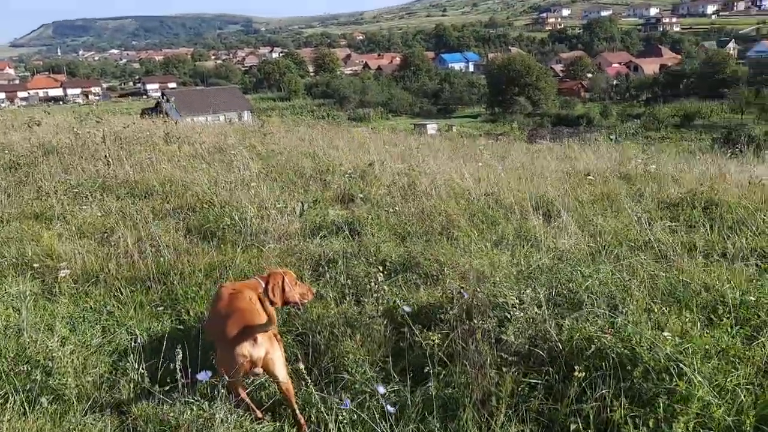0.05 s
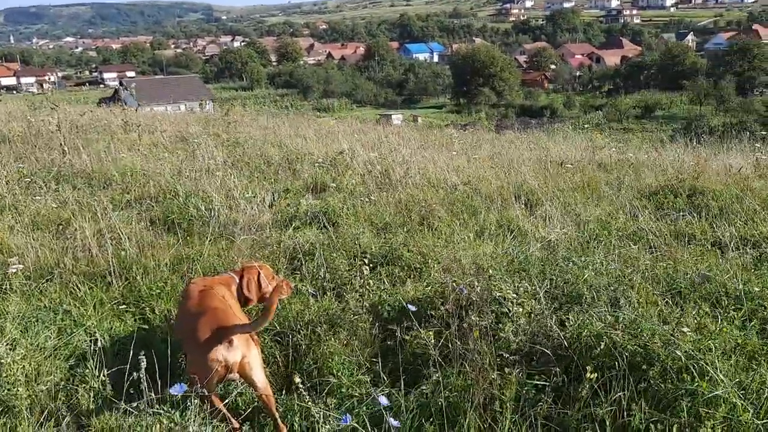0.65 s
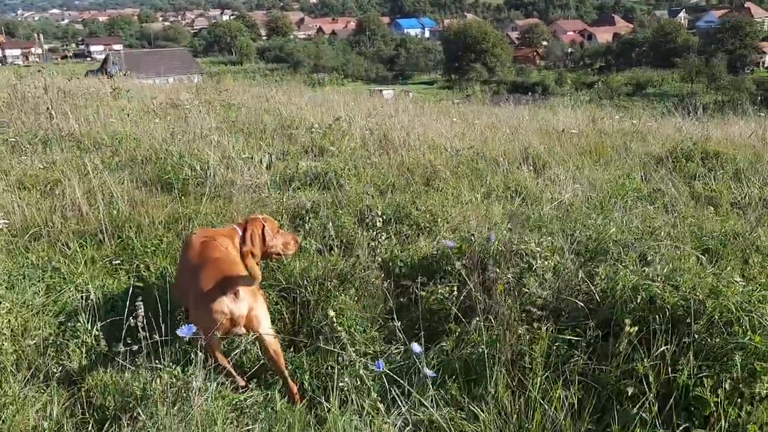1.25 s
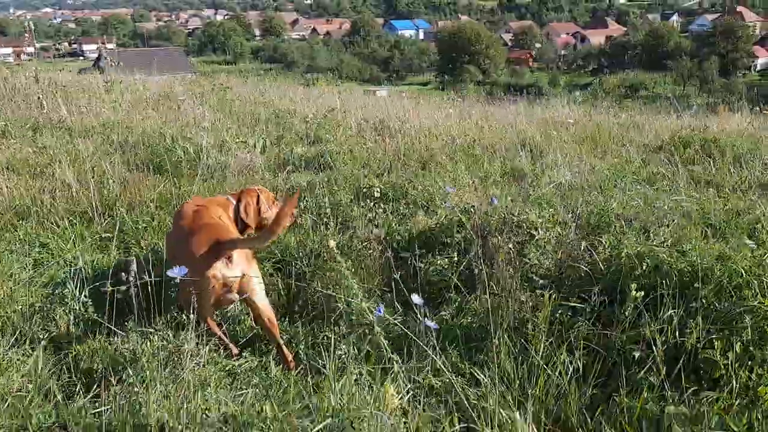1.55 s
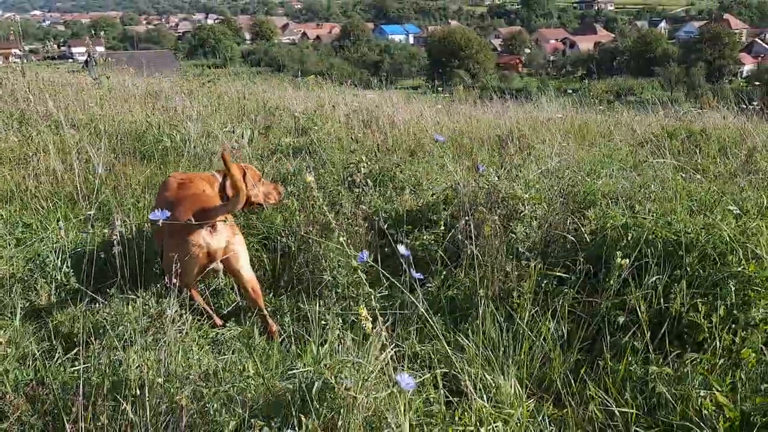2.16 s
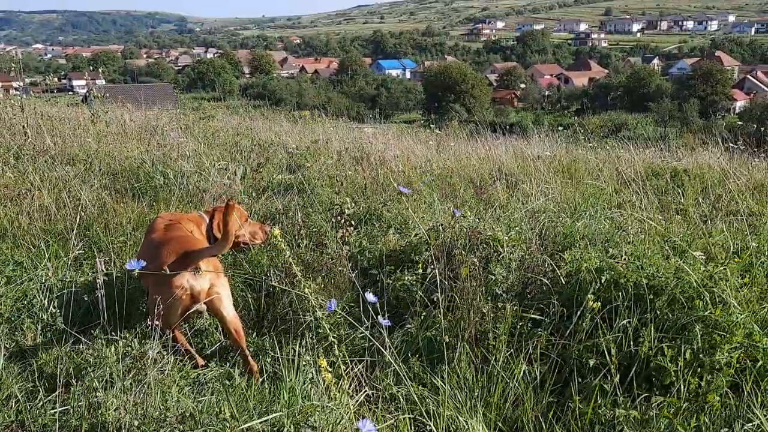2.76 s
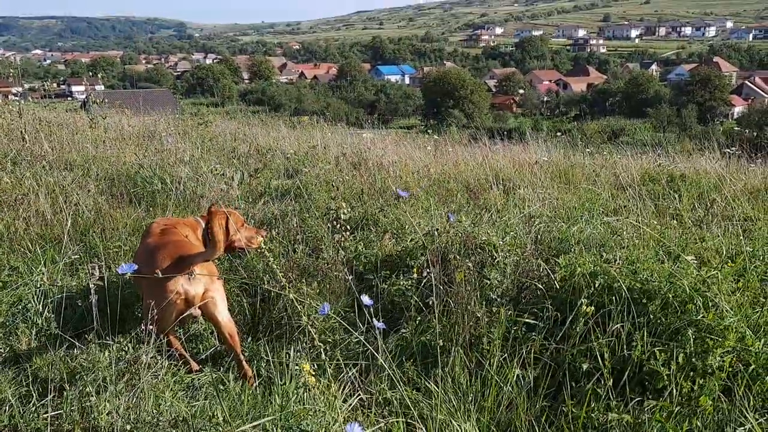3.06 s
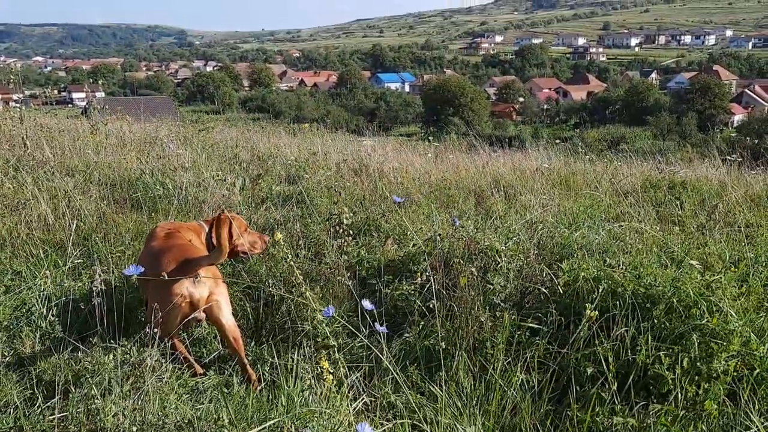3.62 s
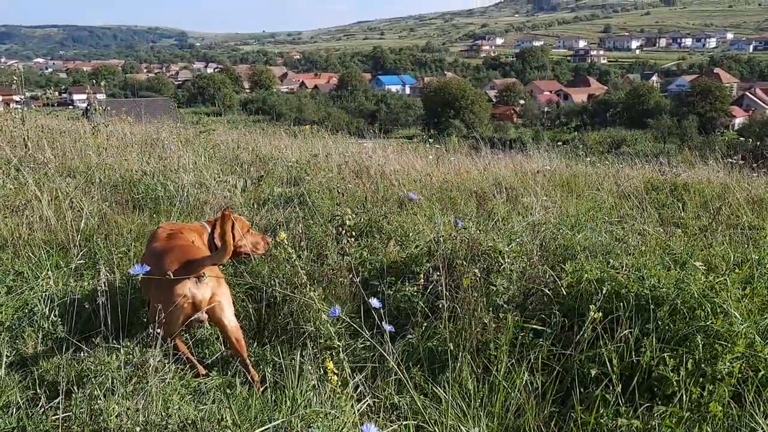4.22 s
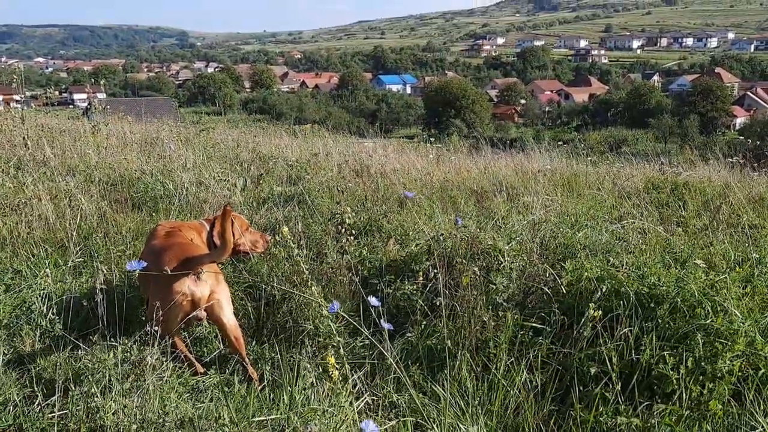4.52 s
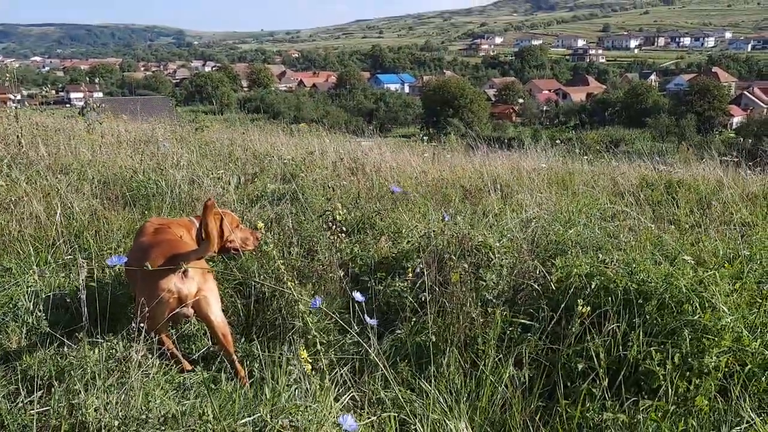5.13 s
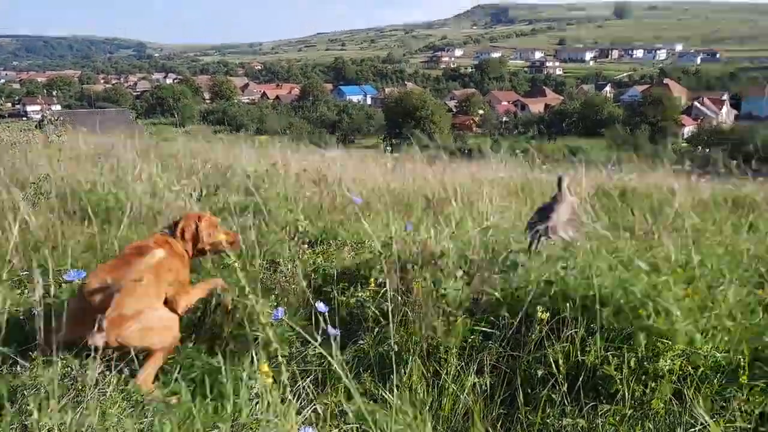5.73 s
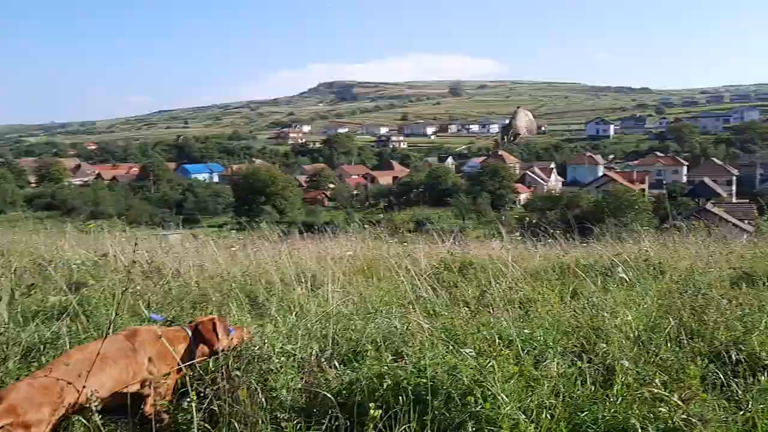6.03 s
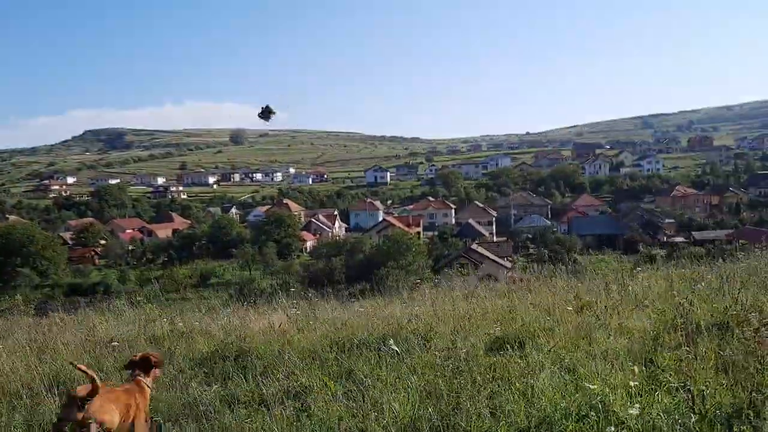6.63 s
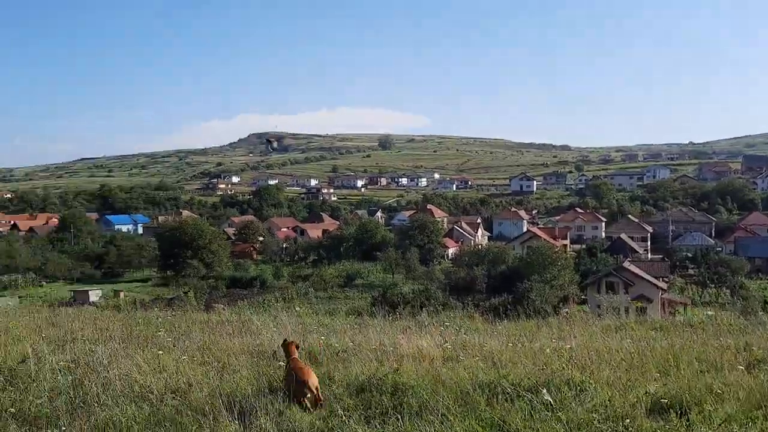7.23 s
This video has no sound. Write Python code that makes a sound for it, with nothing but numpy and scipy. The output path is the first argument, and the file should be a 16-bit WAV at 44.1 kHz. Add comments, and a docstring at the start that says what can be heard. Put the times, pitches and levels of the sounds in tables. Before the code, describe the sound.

In a breezy, quiet meadow, grass stirs softly until a game bird suddenly flushes, stalks snapping and wings whirring away, with wind buffeting the microphone.

```python
"""Pheasant flushed on a hillside

In a meadow above a village, a light breeze hushes over the valley and buffets the microphone ports.
A dog stands on point: grass rustles, stalks snap, a steel clasp clinks on the left and two knocks carry
up from below. Noise suppression leaves two faint tones. A few metres off, a pheasant bursts from cover
with a thin squeak and whirrs away at 13 wing beats a second, the dog crashing through the grass after it."""
import sys
import numpy as np
from scipy import signal
from scipy.fft import rfft, irfft, next_fast_len
from scipy.io import wavfile
from scipy.ndimage import uniform_filter1d, map_coordinates

SR = 44100
rng = np.random.default_rng(int(sys.argv[2]) if len(sys.argv) > 2 else 0)


def wav_record(signal):
    """Record a signal, one row per channel, as 16-bit PCM in the file named by sys.argv[1]."""
    frames = np.transpose(np.atleast_2d(signal))
    bounded = np.clip(frames, -1, 1)
    # unit amplitude maps onto the largest positive 16-bit level
    quanta = np.round(bounded * 32767).astype(np.int16)
    wavfile.write(sys.argv[1], SR, quanta)


N = 329868

# Levels are relative within a layer; pan_db is the left port minus the right.
# breeze out over the valley: time_s, hum_db, hush_db
BREEZE = [(0.0, -63, -61), (0.75, -63.5, -60.5), (1.3, -66, -61.5), (1.56, -66.5, -57),
          (1.75, -67.5, -60.5), (2.5, -72, -62.5), (3.25, -78.5, -65.5), (4.05, -73.5, -61.5),
          (4.3, -75, -59), (4.52, -73.5, -56.5), (4.7, -74.5, -62), (5.45, -75, -63.5), (7.0, -65, -64),
          (7.48, -76.5, -65)]
# spectra of the valley's hum and hush, and of wind on the microphone: frequency_hz, level_db
HUM_SPECTRUM = [(150, -18.5), (300, -6.5), (550, -4.5), (1000, 2), (1400, -3.5), (3000, -33), (6000, -86.5)]
HUSH_SPECTRUM = [(290, -41), (500, -36), (553, -29), (855, -5), (1050, -20), (1180, -2.5), (1720, -1),
                 (2010, -3.5), (2650, -4.5), (3060, -8), (4150, -32.5), (5800, -36), (9220, -45),
                 (15100, -34.5), (16000, -46.5)]
RUMBLE_SPECTRUM = [(22, -23.5), (35, -12.5), (52, 1), (68, 4), (95, -5), (130, -4), (180, -18.5),
                   (240, -24), (400, -38.5), (800, -76.5)]
# the camera body's colouring of the valley at the left port: frequency_hz, gain_db
VALLEY_TILT = [(700, -2.5), (1200, 1.5), (1900, 1.5), (2700, -12.5), (3600, -6.5), (5000, 1)]
# draught on the ports, jumping as the camera swings after the bird: time_s, level_db, pan_db
DRAUGHT = [(0.0, -65.5, -6), (1.0, -66.5, -2.5), (1.3, -58.5, -9), (2.2, -65, 2), (3.4, -63, 0.5),
           (4.25, -62, -1.5), (4.55, -56, 6.5), (4.9, -60.5, 6), (5.62, -62, 5), (5.69, -34.5, -3),
           (6.12, -34.5, 4), (6.45, -46.5, 5), (7.0, -50.5, 1), (7.27, -62, 12), (7.48, -50, 10)]
# single eddies thumping on the ports: centre_s, length_s, level_db, pan_db
EDDIES = [(0.333, 0.05, -54.5, -22), (1.61, 0.068, -54.5, -25), (1.976, 0.032, -54, -12),
          (2.532, 0.044, -40, 23), (2.713, 0.043, -51.5, 15), (2.954, 0.062, -53.5, 15),
          (4.004, .11, -52.5, 18), (4.332, 0.069, -50.5, -22), (4.464, 0.061, -36, -2),
          (4.584, 0.055, -38, 0.5), (4.69, 0.056, -40.5, 13), (4.758, 0.046, -43, 9),
          (4.897, 0.074, -43, 25), (5.161, 0.075, -38, 30), (5.231, 0.054, -42.5, 29),
          (5.433, 0.061, -42.5, 24.5), (5.524, 0.048, -42.5, 27), (5.796, 0.044, -26, -5),
          (6.058, 0.043, -30.5, 3), (6.282, 0.042, -30, 18), (6.34, 0.029, -29, 22), (6.513, 0.041, -36, 8),
          (7.126, 0.11, -39, 20), (7.365, 0.055, -44.5, 18)]
# slow stirring of the grass: time_s, level_db, pan_db
GRASS_STIR = [(0.0, -63.5, 5.5), (0.17, -67, 4), (0.26, -72.5, 4), (0.47, -71, 6), (0.55, -64, 9.5),
              (0.88, -57, 4.5), (1.11, -68.5, 6), (1.25, -66, 6), (1.4, -62, 9), (1.55, -70, 6),
              (1.75, -75.5, 4), (2.3, -75, 2.5), (2.68, -81, -1), (2.95, -91, 4.5), (5.5, -88, -1),
              (5.58, -74, 0)]
# spectra of rubbed leaves, blades, stems and whole thrashed tufts: frequency_hz, level_db
LEAF_SPECTRUM = [(1500, -25), (3000, 2), (4600, -4), (6300, 0), (9000, -11), (11200, -4), (13200, 2),
                 (15700, 1)]
BLADE_SPECTRUM = [(1300, -18), (2400, -11), (3400, -4.5), (4400, -12), (6500, -0.5), (9000, -7.5),
                  (12000, 1), (14500, 6.5), (15900, -5)]
STEM_SPECTRUM = [(1400, -10.5), (2900, 0.5), (4200, -5), (6200, -3.5), (7500, -24), (11000, -44)]
THRASH_SPECTRUM = [(200, 3), (450, 3.5), (800, 5.5), (1300, 1.5), (2400, 1), (3200, -10), (6000, -30.5)]
# the camera body's shading of nearby sounds: frequency_hz, pan_db
PORT_TILT = [(3000, 1.5), (5500, -11), (8300, 14), (11000, 9.5), (15000, -8.5)]
# snapping stalks: start_s, level_db, pan_db, brightest_hz
STALK_SNAPS = [(0.383, -41.5, 13.5, 11400), (1.316, -44.5, 15, 7500), (1.6392, -41.5, 10, 6500),
               (2.271, -51, 10, 14300), (2.668, -46, 7.5, 14500), (5.6521, -28, -2.5, 5900),
               (5.6638, -35, -4.5, 6140), (5.679, -25, -2.5, 5900), (5.7325, -25.5, -3, 6430),
               (5.85, -19.5, 4.5, 7320), (5.8575, -24.5, -8, 6900), (5.921, -30, 1, 13600),
               (6.75, -37, 7.5, 15300), (7.1782, -39.5, 3, 13600)]
# knocks down in the village: start_s, level_db
KNOCKS = [(0.529, -28), (1.15, -22)]
# resonances of the struck wood: centre_hz, width_hz, level_db
WOOD_MODES = [(508, 103, -2.5), (808, 170, 0), (2150, 490, -9.5), (2770, 160, -4.5), (3420, 290, -16),
              (5330, 650, -23.5)]
# decay of the valley's echo: frequency_hz, t60_s
ECHO_DECAY = [(300, 0.27), (2500, .22), (4000, 0.21), (8000, 0.074)]
# clinks of the clasp: start_s, level_db
CLINKS = [(1.39, -38.5), (1.411, -31.5), (1.4342, -13.5), (1.4695, -33.5)]
# ringing of its steel: pitch_hz, level_db, t60_s
CLASP_MODES = [(6760, -14, .03), (11700, -13, .06), (12100, -8, .055), (14680, -2, .11)]
# two tones left by noise suppression, then five brief chirps: start_s, length_s, start_hz, end_hz, level_db
FAINT_TONES = [(2.192, 0.16, 1945, 2020, -69), (3.048, 0.35, 2565, 2560, -74), (4.91, 0.032, 925, 860, -65),
               (5.205, 0.034, 900, 840, -63), (6.873, .016, 5180, 5470, -50),
               (6.925, 0.011, 2200, 1290, -44.5), (7.413, 0.037, 6500, 6330, -60)]
# bird and dog crashing through the grass: time_s, hiss_db, stem_db, hiss_pan_db
GRASS_CRASH = [(5.58, -65, -66.5, 5), (5.625, -62, -58.5, 4), (5.675, -39, -34.5, 3),
               (5.755, -49.5, -41.5, 3), (5.795, -39, -32, 3), (5.835, -48.5, -43, 1.5),
               (5.97, -51.5, -46, 2), (6.03, -46, -42.5, 6), (6.12, -50, -48.5, 6), (6.19, -42, -46.5, 11),
               (6.32, -44.5, -43.5, 11), (6.37, -53.5, -50.5, 10.5), (6.54, -61.5, -59.5, 8.5),
               (6.83, -53.5, -56, 2.5), (6.9, -50.5, -49.5, 4), (7.0, -65.5, -65, 3),
               (7.1, -62, -62.5, 4.5), (7.3, -65.5, -66, 4), (7.48, -66.5, -59.5, 6.5)]
# wing beats: downstroke_s, strength_db
WING_BEATS = [(5.7288, 2.5), (5.7983, 1.5), (5.8724, -1), (5.9501, -1), (6.0245, 1), (6.1015, -3),
              (6.1772, 0.5), (6.2531, -3.5), (6.3264, 3), (6.4078, -0.5), (6.4833, -2), (6.561, -4),
              (6.6391, -1), (6.716, -5.5), (6.797, -1)]
# the bird climbs hard, then levels off: time_s, effort_db, whoop_hz
CLIMB = [(5.76, -13, 600), (5.83, -1.5, 580), (5.99, 0, 461), (6.22, 3, 482), (6.29, -10, 320),
         (6.8, -12, 291)]
# spectra of shoved air and of rubbed feathers: frequency_hz, level_db
WHOOP_SPECTRUM = [(100, -25), (260, 0.5), (380, 1), (520, -0.5), (700, -5), (1100, -10.5), (2500, -24),
                  (6000, -75)]
FEATHER_SPECTRUM = [(400, -21.5), (900, 8), (2200, 8), (3600, 9.5), (6200, -4), (8000, -14.5),
                    (16000, -35.5)]
# claps of the wings: start_s, level_db
WING_CLAPS = [(5.7307, -23), (5.797, -29.5), (5.874, -36), (6.026, -32.5), (6.179, -36)]
# the bird's squeak: time_s, pitch_hz, level_db
SQUEAK = [(5.738, 4950, -53), (5.749, 4880, -41), (5.756, 4564, -37), (5.769, 4750, -39),
          (5.786, 5210, -35), (5.796, 4800, -41), (5.810, 5090, -36), (5.826, 4360, -58)]


def amp(db):
    """Decibels to gain."""
    return 10 ** (np.asarray(db) / 20)


def unit(x):
    """Scale to rms 1."""
    return x / np.sqrt(np.mean(x ** 2) + 1e-20)


def along(points, hz):
    """Read (frequency_hz, value) points on a log axis."""
    frequencies, values = np.transpose(points)
    return np.interp(np.log(hz + 1), np.log(frequencies + 1), values)


def curves(rows):
    """One value per sample for each column after the time."""
    times, *columns = np.transpose(rows)
    return [np.interp(np.arange(N) / SR, times, column) for column in columns]


def wobble(rate):
    """A smooth random curve, rate knots a second."""
    return map_coordinates(rng.standard_normal(int(N * rate / SR) + 4), [np.arange(N) * rate / SR])


def add(track, start_s, sound):
    """Mix a sound into a track."""
    start = round(start_s * SR)
    track[..., start:start + sound.shape[-1]] += sound


def swells(times, levels_db, rise_s, fall_s):
    """An envelope with one swell per stroke."""
    envelope, t = np.zeros(N + SR), np.arange(SR // 8) / SR
    shape = np.where(t < rise_s, np.sin(np.pi / 2 * t / rise_s), np.exp(-np.abs(t - rise_s) / fall_s))
    for start_s, db in zip(times, levels_db):
        add(envelope, start_s, amp(db) * shape)
    return envelope[:N]


def filtered(x, response):
    """x times a complex response of frequency."""
    size = x.shape[-1]
    padded = next_fast_len(size + 8192)
    return irfft(rfft(x, padded) * response(np.fft.rfftfreq(padded, 1 / SR)), padded)[..., :size]


def coloured(x, spectrum):
    """x given a spectrum, at rms 1."""
    return unit(filtered(x, lambda hz: amp(along(spectrum, hz))))


def steadied(x, seconds):
    """Even out the chance swells of a noise."""
    power = uniform_filter1d(np.mean(x ** 2, axis=0), int(seconds * SR) + 1)
    return x / np.sqrt(np.abs(power) + 1e-6)


def patchy(x, depth_db):
    """Narrow bands swell and fade on their own."""
    bands = signal.stft(x, nperseg=2048)[2]
    patches = uniform_filter1d(rng.standard_normal(bands.shape[1:]), size=4, axis=0)
    patches = uniform_filter1d(patches, size=14, axis=1, mode="wrap")
    return unit(signal.istft(bands * amp(depth_db * unit(patches)), nperseg=2048)[1][:, :N])


def port_noise(alike):
    """White noise at the two microphone ports, which share the fraction alike of its power."""
    return np.sqrt(alike) * rng.standard_normal(N) + np.sqrt(1 - alike) * rng.standard_normal((2, N))


def placed(x, pan_db, lag_ms=0):
    """Stereo with the left port louder by pan_db and later by lag_ms."""
    left, right = np.broadcast_to(x, (2, x.shape[-1]))
    if lag_ms:
        left = filtered(left, lambda hz: np.exp(-2j * np.pi * hz * lag_ms / 1000))
    gain = amp(pan_db / 2)
    return np.array([left * gain, right / gain]) / np.sqrt((gain ** 2 + gain ** -2) / 2)


def shaded(x):
    """The camera body shades each port at different frequencies."""
    return filtered(x, lambda hz: amp(np.outer([.5, -.5], along(PORT_TILT, hz))))


def valley_breeze():
    """The valley hums and hushes from the right; the camera body colours it on the far port."""
    hum_db, hush_db = curves(BREEZE)
    hum = amp(hum_db + 5.5) * patchy(coloured(port_noise(0.78), HUM_SPECTRUM), depth_db=3)
    hush_gain = amp(hush_db + 2 + 1.4 * wobble(12))
    hush = hush_gain * patchy(coloured(port_noise(0.32), HUSH_SPECTRUM), depth_db=3)
    left, right = placed(hum, pan_db=1, lag_ms=0.33) + placed(hush, pan_db=-6, lag_ms=0.43)
    return np.array([filtered(left, lambda hz: amp(along(VALLEY_TILT, hz))), right])


def microphone_wind(flicker_db=3, eddy_flicker_db=2):
    """A restless draught rumbles right on the ports; each passing eddy swells and dies in a bell shape."""
    t = np.arange(N) / SR
    draught_db, draught_pan_db = curves(DRAUGHT)
    draught_gain = amp(draught_db + flicker_db * wobble(14))
    draught = draught_gain * steadied(coloured(port_noise(0.6), RUMBLE_SPECTRUM), seconds=.04)
    thumps = sum(placed(amp(db) * np.exp(-2 * ((t - centre_s) / length_s) ** 2), pan_db)
                 for centre_s, length_s, db, pan_db in EDDIES)
    rumble = steadied(coloured(port_noise(0.5), RUMBLE_SPECTRUM), seconds=0.072)
    return placed(draught, draught_pan_db) + thumps * amp(eddy_flicker_db * wobble(40)) * rumble


def crackle(spectrum, alike, rate, spread_db, flutter_db=1.35):
    """Rubbing noise that catches and slips, with tiny fractures of unequal size, rate a second."""
    size = amp(np.minimum(spread_db * rng.exponential(size=N), 9))
    fractures = (rng.random(N) < rate / SR) * size
    return coloured(port_noise(alike) * (1 + 2 * fractures) * amp(flutter_db * wobble(70)), spectrum)


def grass_stir():
    """Leaves rub softly near the microphone, mostly to the left."""
    db, pan_db = curves(GRASS_STIR)
    leaves = crackle(LEAF_SPECTRUM, alike=0.081, rate=540, spread_db=1.5)
    return shaded(placed(amp(db + 5) * leaves, pan_db))


def stalk_snaps(bend_s=0.0003, crack_s=0.00096, splinter_s=0.013, splinter_db=-16):
    """A dry stalk bends, breaks with a crack in its own colour and splinters briefly."""
    track, t = np.zeros((2, N + SR)), np.arange(SR // 16) / SR
    decay = np.exp(-t / crack_s) + amp(splinter_db) * np.exp(-t / splinter_s)
    shape = decay * (1 - np.exp(-t / bend_s))
    for start_s, db, pan_db, hz in STALK_SNAPS:
        colour = [(hz / 3, -20), (hz * 0.8, -7), (hz, 0), (hz * 1.25, -6), (hz * 3, -11)]
        bright = coloured(rng.standard_normal((2, len(t))), colour)
        woody_db = 3 - 18.5 * np.log2(hz / 6200)  # thin stalks snap higher and with less wood
        woody = amp(woody_db) * coloured(rng.standard_normal(len(t)), FEATHER_SPECTRUM)
        add(track, start_s, placed(amp(db) * (bright + woody) * shape, pan_db))
    return track[:, :N]


def valley_echo(x):
    """A diffuse outdoor tail in which the treble dies first."""
    hz, t, bands = signal.stft(rng.standard_normal((2, SR // 2)), SR, nperseg=256)
    decay = amp(-60 * t / along(ECHO_DECAY, hz)[:, None])
    tail = signal.istft(bands * decay, SR, nperseg=256)[1]
    return signal.fftconvolve(np.atleast_2d(x), tail / np.linalg.norm(tail[0]), axes=1)[:, :N]


def village_knocks(lead_s=0.0069, lead_db=-9, high_cut_hz=6500, echo_db=-6):
    """Two far blows on wood, each a light scraping touch and then the full hit, trailed by the echo."""
    def wood(hz):
        modes = sum((-1) ** k * amp(db) * 1j * hz * width / (centre ** 2 - hz ** 2 + 1j * hz * width)
                    for k, (centre, width, db) in enumerate(WOOD_MODES))
        return modes / (1 + (hz / high_cut_hz) ** 6)

    times, levels_db = np.transpose(KNOCKS)
    touch = swells(times - lead_s, levels_db + lead_db, rise_s=0.0044, fall_s=0.0067)
    blow = swells(times + 0.00079, levels_db, rise_s=0.0015, fall_s=0.0017)
    force = (touch + blow) * rng.choice([-1, 1], N)
    hit = amp(10.5) * filtered(force, wood)
    return placed(hit + amp(echo_db) * valley_echo(hit), pan_db=-4, lag_ms=0.3)


def clasp(tick_s=0.00045, rattle_s=0.01, rattle_db=-25, ring_db=-23, slide_db=-30):
    """Close by on the left, small steel parts slide, tick together and ring very high."""
    track, t = np.zeros(N + SR), np.arange(SR // 8) / SR
    steel = [(600, -28.5), (2000, -5.5), (4500, 1), (9000, -4.5), (14500, 4)]  # frequency_hz, level_db
    shape = np.exp(-t / tick_s) + amp(rattle_db) * np.exp(-t / rattle_s)
    for start_s, db in CLINKS:
        ring = sum(amp(mode_db + rng.normal(0, 2) - 60 * t / t60_s) * np.sin(2 * np.pi * hz * t)
                   for hz, mode_db, t60_s in CLASP_MODES)
        tick = shape * coloured(rng.standard_normal(len(t)), steel)
        add(track, start_s, amp(db - 5.5) * (tick + amp(ring_db) * ring))
    times, levels_db = np.transpose(CLINKS)
    sliding = swells(times - .008, levels_db + slide_db, rise_s=0.0045, fall_s=.004)
    slide = sliding * coloured(rng.standard_normal(N), steel)
    # parts this small radiate no bass
    thin = filtered(track[:N] + slide, lambda hz: hz ** 2 / (hz ** 2 + 1500 ** 2))
    return shaded(placed(thin, pan_db=11.5))


def faint_tones():
    """The recorder's noise suppression leaves narrow tones near 2 and 2.6 kHz; brief chirps come later."""
    track = np.zeros(N)
    for start_s, length_s, start_hz, end_hz, db in FAINT_TONES:
        progress = np.linspace(0, 1, int(length_s * SR))
        tone = np.sin(2 * np.pi * np.cumsum(start_hz + (end_hz - start_hz) * progress) / SR)
        add(track, start_s, amp(db + 4) * np.sin(np.pi * progress) * tone)
    return placed(track, pan_db=-9.5)


def grass_crash(dog_takes_over_s=6.1, handover_s=0.16):
    """Bodies crash through blades, stems and tufts: first the bird, then the dog off to the left."""
    hiss_db, stem_db, hiss_pan_db = curves(GRASS_CRASH)
    blades = amp(hiss_db + 2.5) * crackle(BLADE_SPECTRUM, alike=0.081, rate=1100, spread_db=-0.5)
    bird_stems = crackle(STEM_SPECTRUM, alike=0.37, rate=580, spread_db=7)
    bird_tufts = amp(-1.5) * crackle(THRASH_SPECTRUM, alike=0.85, rate=910, spread_db=-2.5)
    bird = placed(bird_stems, pan_db=-6) + placed(bird_tufts, pan_db=-1)
    dog_stems = crackle(STEM_SPECTRUM, alike=0.073, rate=470, spread_db=7)
    dog_tufts = amp(-1) * crackle(THRASH_SPECTRUM, alike=0.4, rate=540, spread_db=-0.5)
    # the dog reaches the left port first, though a little louder on the right
    dog = placed(dog_stems, pan_db=-2.5, lag_ms=-0.28) + placed(dog_tufts, pan_db=-2.5, lag_ms=-0.32)
    dog_share = np.clip((np.arange(N) / SR - dog_takes_over_s) / handover_s + .5, 0, 1)
    bodies = np.sqrt(1 - dog_share) * bird + np.sqrt(dog_share) * dog
    return shaded(placed(blades, hiss_pan_db)) + amp(stem_db) * bodies


def flight(times, start_m=2.37, accel_m_per_s2=22.5):
    """The bird speeds away from the microphone: distance_db, effort_db, whoop_hz at the given times."""
    distance_m = start_m + accel_m_per_s2 / 2 * (times - WING_BEATS[0][0]) ** 2
    distance_db = 20 * np.log10(start_m / distance_m)
    climb_s, effort_db, whoop_hz = np.transpose(CLIMB)
    return distance_db, np.interp(times, climb_s, effort_db), np.interp(times, climb_s, whoop_hz)


def air_puffs(times, levels_db, pitches_hz, width_s, scatter=0.047):
    """Rounded puffs of air, a few cycles each, sagging in pitch as the wing slows."""
    track = np.zeros(N + SR)
    progress = np.minimum(np.arange(SR // 16) / SR / width_s, 1)
    window = np.sin(np.pi * progress) ** 2
    for start_s, db, hz in zip(times, levels_db, pitches_hz):
        detune, phase = rng.standard_normal(2)
        pitch_hz = hz * (1 + scatter * detune) * (1.15 - 0.26 * progress)
        tone = np.sin(2 * np.pi * np.cumsum(pitch_hz) / SR + np.pi * phase)
        add(track, start_s, amp(db) * window * tone)
    return track[:N]


def wing_air(upstroke_lead_s=.034, turn_lag_s=0.024, down_effort_share=0.48):
    """Each stroke shoves air in a hollow whoop and rubs the feathers; the wing flaps again as it turns."""
    down_s, strength_db = np.transpose(WING_BEATS)
    distance_db, effort_db, down_hz = flight(down_s)
    down_db = strength_db + distance_db + down_effort_share * effort_db
    up_s = down_s[1:] - upstroke_lead_s
    distance_db, effort_db, up_hz = flight(up_s)
    up_db = distance_db + effort_db
    whoop = air_puffs(down_s - .002, down_db - 31.5, down_hz, width_s=0.0213)
    whoop += air_puffs(up_s - .002, up_db - 31.5, up_hz, width_s=0.021)
    whoop += air_puffs(down_s + turn_lag_s, down_db - 30, 0.896 * down_hz, width_s=0.0104)
    wake = swells(down_s, down_db - 30, rise_s=0.0043, fall_s=0.0096)
    wake += swells(up_s, up_db - 36, rise_s=0.0021, fall_s=0.014)
    swish = swells(down_s, down_db - 47, rise_s=0.012, fall_s=0.0046)
    swish += swells(up_s, up_db - 41, rise_s=0.0058, fall_s=0.012)
    air = whoop + wake * steadied(coloured(port_noise(0.98), WHOOP_SPECTRUM), seconds=0.0079)
    feathers = swish * coloured(port_noise(0.21), FEATHER_SPECTRUM)
    return placed(air, pan_db=0.5) + placed(feathers, pan_db=-1)


def wing_tips(high_hz=2400, floor_hz=1250, sweep_s=0.017, push_hz=112, push_s=0.0166, effort_share=0.48):
    """The primaries whip through the air with a short falling whistle over a low push of air."""
    track, t = np.zeros(N + SR), np.arange(SR // 12) / SR
    glide_hz = floor_hz + (high_hz - floor_hz) * np.exp(-2 * t / sweep_s)
    whip_shape = np.sin(np.pi * np.minimum(t / sweep_s, 1)) ** 2
    push_shape = t / push_s * np.exp(1 - t / push_s)
    for start_s, strength_db in WING_BEATS:
        distance_db, effort_db, _ = flight(start_s)
        flutter = .2 * unit(uniform_filter1d(rng.standard_normal(len(t)), size=20))
        whip = amp(-36) * whip_shape * np.sin(2 * np.pi * np.cumsum(glide_hz * (1 + flutter)) / SR)
        pitch_hz = push_hz * (1 + 0.093 * rng.standard_normal())
        push = amp(-29.5 + effort_share * effort_db) * push_shape * np.sin(2 * np.pi * pitch_hz * t)
        add(track, start_s, amp(strength_db + distance_db) * (whip + push))
    return placed(track[:N], pan_db=-1)


def wing_claps():
    """Straight ahead, the wings strike the cover and each other with short, dry slaps."""
    times, levels_db = np.transpose(WING_CLAPS)
    slap = steadied(crackle(THRASH_SPECTRUM, alike=0.92, rate=680, spread_db=6), seconds=0.0052)
    return placed(swells(times, levels_db, rise_s=0.0026, fall_s=0.0048) * slap, pan_db=0.5)


def alarm_squeak(roughness=0.0256):
    """One thin, wavering note of alarm at take-off."""
    hz, db = curves(SQUEAK)
    t = np.arange(N) / SR
    sounding = (t > SQUEAK[0][0]) & (t < SQUEAK[-1][0])
    tone = np.sin(2 * np.pi * np.cumsum(hz * (1 + roughness * wobble(900))) / SR)
    return placed(tone * sounding * amp(db + 2 + 2.2 * wobble(200)), pan_db=-2)


def scene(echo_db=-16.5):
    """Bird and grass are close, in nearly dry open air; the village and the valley lie beyond."""
    pheasant = wing_air() + wing_tips() + wing_claps() + alarm_squeak()
    near = pheasant + stalk_snaps() + clasp() + faint_tones()
    echo = amp(echo_db) * valley_echo(near)
    before_flush = np.arange(N) / SR <= GRASS_CRASH[0][0]
    grass = np.where(before_flush, grass_stir(), grass_crash())
    return near + echo + grass + village_knocks() + valley_breeze() + microphone_wind()


def record(dry, low_cut_hz=30, top_hz=15950):
    """The camera's microphone drops the deepest rumble and keeps nothing above its band limit."""
    return filtered(dry, lambda hz: (hz < top_hz) * hz ** 4 / (hz ** 4 + low_cut_hz ** 4))


dry = scene()
out = record(dry)
wav_record(out)
```